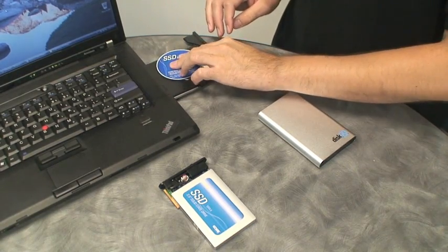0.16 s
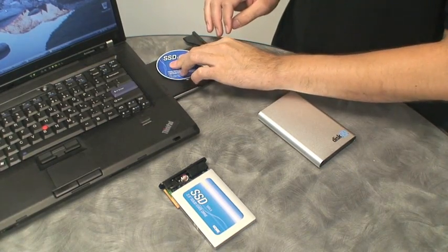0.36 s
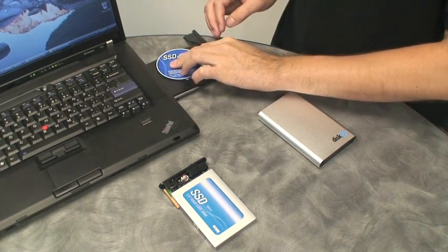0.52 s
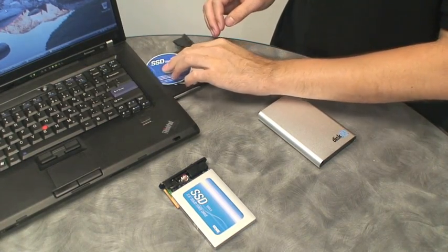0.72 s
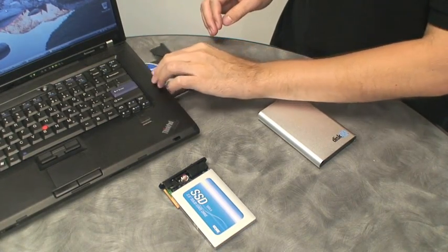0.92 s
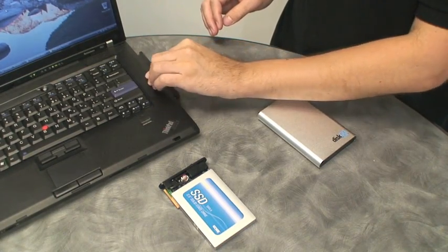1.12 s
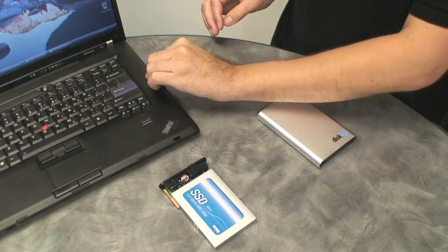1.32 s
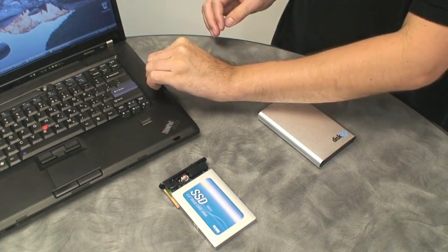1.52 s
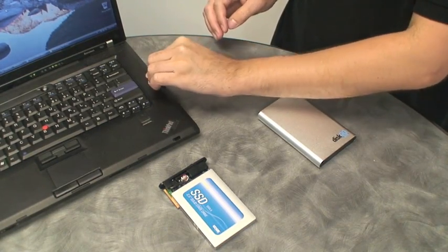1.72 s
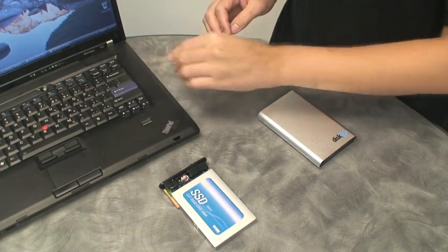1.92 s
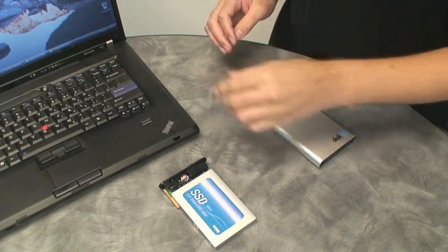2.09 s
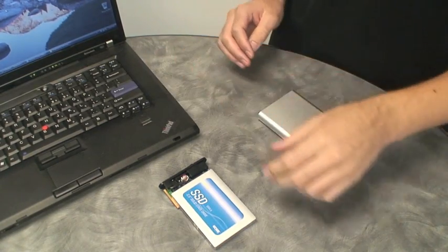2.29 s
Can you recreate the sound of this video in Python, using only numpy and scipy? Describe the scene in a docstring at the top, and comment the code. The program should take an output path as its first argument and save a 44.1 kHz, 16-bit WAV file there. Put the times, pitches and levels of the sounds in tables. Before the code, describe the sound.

A disc snaps hard onto a laptop drive hub, then the thin plastic tray knocks, scrapes inward and latches with a double click, close to the microphone in a small room with faint fan hum.

```python
"""Plastic contacts: a disc snaps onto the hub of a laptop drive tray, and the tray is slid shut and latched.
Each contact is a dying chatter of ticks that excites a ring at its own pitch and the tray's crowded modes.
The snap rings the modes of the disc; blows excite the modes of the table and the laptop case.
Fingers and rails rub faintly as dense fine grains, and a small room answers with a diffuse echo.
Steady filtered noise and a wavering motor tone make a fan-like hiss and hum beneath."""
import sys
import numpy as np
from scipy import signal
from scipy.fft import rfft, irfft
from scipy.io import wavfile
from scipy.ndimage import uniform_filter1d

SR = 44100
rng = np.random.default_rng(int(sys.argv[2]) if len(sys.argv) > 2 else 0)


def gain_from_decibels(decibels):
    """Convert decibel values to linear amplitude factors."""
    exponent = np.asarray(decibels, float) / 20
    return 10 ** exponent


def transcribe(signal):
    """Save signal, clipped to [-1, 1], as a 16-bit WAV file at the path in sys.argv[1]."""
    frames = np.atleast_2d(signal).T
    limited = np.clip(frames, -1, 1)
    pcm = np.round(limited * 32767).astype(np.int16)
    wavfile.write(sys.argv[1], SR, pcm)


N = 103635

# blows on table and case: t/s, level of the table push/dB, level of the case knock/dB,
# f/Hz of the part of the case that is driven most
BLOWS = [(.252, -34.5, -31, 980), (.668, -65, -45.5, 725), (.753, -51.5, -43, 954),
         (0.987, -45.5, -36.5, 620), (0.991, -54, -34.5, 1150), (1.208, -50, -54, 1150),
         (1.451, -38, -32, 610), (1.455, -76, -30.5, 920), (1.484, -60, -44, 920), (1.656, -72, -48, 680),
         (1.907, -45, -52, 1150), (1.931, -46.5, -63, 720)]


def rms_one(x):
    """Normalisation to unit mean power."""
    return x / np.sqrt(np.mean(x ** 2) + 1e-20)


def at_hz(points, hz):
    """Linear interpolation over logarithmic frequency."""
    f, value = np.transpose(points)
    return np.interp(np.log(hz), np.log(f), value)


def ring(x, hz, t60):
    """Damped resonance: a unit click sets a sine of initial height 1 ringing."""
    radius = gain_from_decibels(-60 / (max(t60, 0.002) * SR))
    w = 2 * np.pi * hz / SR
    return signal.lfilter([0, np.sin(w)], [1, -2 * radius * np.cos(w), radius ** 2], x + 1e-18)


def ticks(shape, rate, spread_db):
    """Random impulse process: clicks of uneven size and sign, rate per second."""
    sizes = gain_from_decibels(spread_db * np.minimum(rng.exponential(1, shape), 4))
    signs = rng.choice([-1, 1], shape)
    return sizes * signs * (rng.random(shape) < rate / SR)


def bin_hz(n):
    """Frequencies of the Fourier bins, held above 10 Hz for the logarithm."""
    return np.maximum(np.arange(n // 2 + 1) * SR / n, 10)


def coloured(x, spectrum):
    """Linear filtering by multiplication of the Fourier spectrum with a smooth gain."""
    n = x.shape[-1]
    return irfft(rfft(x) * gain_from_decibels(at_hz(spectrum, bin_hz(n))), n)


def drift(rate):
    """Low-passed noise: a slow random fluctuation of unit rms, rate in Hz."""
    hz = np.arange(N // 2 + 1) * SR / N
    gain = (hz > 0) / (1 + (hz / rate) ** 2)
    return rms_one(irfft(rfft(rng.standard_normal(N)) * gain, N))


def pair(mid, side, alike):
    """Interchannel correlation set by the balance of a shared and an opposed part."""
    alike = np.clip(alike, -1, 1)
    return np.sqrt(1 + alike) * mid + np.sqrt(1 - alike) * side * [[1], [-1]]


def hiss():
    """Stationary coloured noise whose correlation between left and right depends on frequency."""
    # spectrum of the hiss: f/Hz, level per Hz/dB (relative)
    hiss_colour = [(12, -49), (20, -9.5), (120, -5), (181, -3.5), (361, -8), (662, -7), (825, -9),
                   (1030, -10.5), (1150, -10.5), (1470, -14), (1940, -14), (5090, -21.5), (14500, -29)]
    # likeness of left and right: f/Hz, correlation (-1 to 1)
    hiss_likeness = [(60, 0.82), (130, 1), (290, 0.45), (640, -0.26), (1410, -0.8), (3100, -0.3),
                     (6820, 0.17), (15000, 1)]
    mid, side = rfft(coloured(rng.standard_normal((2, N)), hiss_colour))
    stereo = irfft(pair(mid, side, at_hz(hiss_likeness, bin_hz(N))), N)
    return gain_from_decibels(-54) * rms_one(stereo)


def hum():
    """Narrow-band noise: a band of random phases is heard as a wavering hum."""
    # humming bands: f/Hz, width at half amplitude/Hz, rms level/dB
    hum_bands = [(74.6, 16, -68), (114, 8.5, -70)]
    white = rfft(rng.standard_normal(N))
    out = np.zeros(N)
    for f, width, db in hum_bands:
        resonance = 1 / (1 + (2 * (bin_hz(N) - f) / width) ** 2)
        out += gain_from_decibels(db) * rms_one(irfft(white * resonance, N))
    return out


def motor_tone():
    """Frequency and amplitude modulation of a sine by slow random fluctuations."""
    tone_hz, waver_hz = 175.6, 1.5
    level_db, waver_db = -63, 2
    level = gain_from_decibels(level_db + waver_db * drift(6.3))
    phase = 2 * np.pi * np.cumsum(tone_hz + waver_hz * drift(1.6)) / SR
    return level * np.sqrt(2) * np.sin(phase)


def rubbing():
    """Friction as a dense train of micro-impacts, in a changing mixture of dull and bright."""
    # level of the rubbing of fingers and rails: t/s, level/dB
    rub_level = [(0, -59), (.6, -59.5), (.85, -56), (.87, -52.5), (.97, -52.5), (1.1, -55), (1.38, -54),
                 (1.6, -58.5), (1.74, -62.5), (1.755, -54), (1.78, -62.5), (1.89, -60.5), (1.903, -50),
                 (1.96, -52), (2.01, -54), (2.045, -59), (2.055, -52.5), (2.075, -62), (2.35, -64.5)]
    # dull part: f/Hz, level per Hz/dB (relative)
    dull_colour = [(250, -30.5), (500, 3), (1000, 6.5), (2000, 2), (3500, -9.5), (6000, -17.5),
                   (14000, -32)]
    # bright part: f/Hz, level per Hz/dB (relative)
    bright_colour = [(800, -27.5), (2000, -4.5), (5000, -5.5), (9000, -8.5), (13000, -12.5), (16000, -30.5)]
    # brighter on the rails than on the table: t/s, share of the bright part (0 to 1)
    bright_share = [(0, 0.06), (.8, 0.48), (1.45, 0.27), (1.7, 0.04), (2.35, 0)]
    grains_per_s, grain_spread_db, lumps_db = 6500, 2.3, 2.2
    t = np.arange(N) / SR
    share = np.clip(np.interp(t, *np.transpose(bright_share)), 0, 1)
    grains = ticks(N, grains_per_s, grain_spread_db) * gain_from_decibels(lumps_db * drift(33))
    dull = rms_one(coloured(grains, dull_colour))
    bright = rms_one(coloured(grains, bright_colour))
    return gain_from_decibels(np.interp(t, *np.transpose(rub_level))) * ((1 - share) * dull + share * bright)


def tray_response(hz, size):
    """Modal superposition: impulse responses of the tray's short modes, one row a mode, signs alternating."""
    # strength of the tray and disc modes: f/Hz, level/dB
    tray_strength = [(500, -27), (1000, -18), (1500, -20), (2000, -6.5), (2700, -3), (4500, -1), (6400, 0),
                     (8500, -4), (11000, -5.5), (13000, -4), (14000, -25), (15200, -6), (16300, -29.5)]
    tray_t60_s = 0.004
    click = np.eye(1, size)[0]
    return np.array([(-1) ** k * gain_from_decibels(at_hz(tray_strength, f)) * ring(click, f, tray_t60_s)
                     for k, f in enumerate(hz)])


def short_time_peak_one(x):
    """Normalisation to unit peak of the rms over 3 ms."""
    return x / np.sqrt(uniform_filter1d(x ** 2, size=132).max())


def contacts():
    """Impact excitation: a dying chatter of ticks drives a short ring and the tray; harder is sharper."""
    # plastic contacts: t/s, level/dB, f/Hz of the contact's own ring,
    # tray ring re that level/dB, chatter t60/s
    contact_list = [(0.1946, -30.5, 1680, -22.5, 0.027), (0.2460, -16, 8650, -7.5, 0.027),
                    (0.2467, -4.5, 2010, -16, 0.017), (0.2491, 0, 1877, -12.5, 0.029),
                    (0.2529, -9.5, 5760, -7.5, 0.025), (0.2557, -11.5, 11500, -7.5, 0.027),
                    (0.2588, -11.5, 2000, -13, 0.029), (0.2613, -20, 6460, -4.5, 0.044),
                    (0.2675, -21, 4760, -17, 0.015), (0.6662, -33, 2960, -12, 0.046),
                    (0.6716, -33, 2000, -12, 0.047), (0.6826, -42.5, 2200, -12, 0.04),
                    (0.7525, -29.5, 1980, -27, 0.0087), (0.9379, -41.5, 2830, -6.5, 0.017),
                    (0.9852, -23.5, 7000, -5, 0.0067), (0.9866, -11.5, 2050, -14, 0.013),
                    (0.9912, -24, 2840, -8, 0.035), (1.2024, -34.5, 1820, -22, 0.0094),
                    (1.2067, -17.5, 6780, -10.5, 0.014), (1.2078, -17, 3300, -18.5, 0.01),
                    (1.2130, -25.5, 3070, -10.5, 0.013), (1.2157, -24, 2900, -13, 0.021),
                    (1.3279, -29, 2560, -15, 0.024), (1.405, -26.5, 1780, -8.5, 0.014),
                    (1.411, -31.5, 1770, -6, 0.0073), (1.4484, -17, 2240, -13, 0.021),
                    (1.4497, -7.5, 2240, -20.5, 0.015), (1.4533, -21.5, 3000, -13, 0.03),
                    (1.4576, -22.5, 1950, -1.5, 0.035), (1.494, -23.5, 10300, -12, 0.0069),
                    (1.849, -39, 2200, -17.5, 0.014), (1.9, -34, 2920, -22, 0.053),
                    (1.9215, -36, 2400, -20, 0.02)]
    ticks_per_s, tick_spread_db, lead_tick_db = 9000, 4, 15
    rise_s = 0.0005
    own_ring_db, ring_at_2khz_s = -12.5, 0.0051
    # low-pass corner when the tray rings at -30 dB, and its growth with level
    sharp_at_30_hz, octaves_per_10_db = 7000, 1
    mode_spread_db, low_cut_hz = 1.5, 380

    size = 4096
    t = np.arange(size) / SR
    modes_hz = np.arange(480, 16400, 260.0)
    modes_hz = modes_hz + rng.uniform(-80, 80, len(modes_hz))
    responses = tray_response(modes_hz, size)
    out = np.zeros(N + SR)
    for s, db, hz, tray_db, t60 in contact_list:
        train = ticks(size, ticks_per_s, tick_spread_db)
        train[int(rise_s * SR) + 1] = gain_from_decibels(lead_tick_db)
        chatter = train * (1 - np.exp(-t / rise_s)) * gain_from_decibels(-60 * t / max(t60, 0.002))

        # each contact drives the modes a little differently
        response = gain_from_decibels(rng.normal(0, mode_spread_db, len(modes_hz))) @ responses
        tray = signal.fftconvolve(chatter, response)[:size]
        sharp_hz = sharp_at_30_hz * 2 ** (octaves_per_10_db * (db + tray_db + 30) / 10)
        sharp_hz = np.clip(sharp_hz, 1000, 18000)
        tray = signal.lfilter(*signal.butter(1, sharp_hz, fs=SR), tray)

        # higher contacts die sooner
        ring_s = ring_at_2khz_s * np.sqrt(2000 / hz)
        own = ring(ring(chatter, hz, ring_s), hz, ring_s / 2)
        both = gain_from_decibels(own_ring_db) * short_time_peak_one(own) + gain_from_decibels(tray_db) * short_time_peak_one(tray)
        start = int((s - rise_s) * SR)
        out[start:start + size] += gain_from_decibels(db) * both
    return signal.sosfilt(signal.butter(2, low_cut_hz, "high", fs=SR, output="sos"), out[:N])


def disc():
    """Free vibration: one blow, as the disc snaps onto the hub, sets its modes ringing."""
    # modes of the disc: f/Hz, level re the blow/dB, t60/s
    disc_modes = [(1388, -15, 0.056), (1500, -4.5, 0.066), (1644, -12, 0.054), (1770, -20, .05),
                  (1944, 4.5, 0.033), (2110, -12.5, 0.054)]
    snap_s, snap_db = 0.2497, -11
    blow = np.zeros(N)
    blow[int(snap_s * SR)] = gain_from_decibels(snap_db)
    return sum((-1) ** k * gain_from_decibels(db) * ring(blow, hz, t60) for k, (hz, db, t60) in enumerate(disc_modes))


def case_knock():
    """Selective modal excitation: a knock drives most the case modes nearest to its own frequency."""
    # modes of the case: f/Hz, level/dB, t60/s
    case_modes = [(470, -2, 0.14), (620, 1, 0.048), (720, 4, .05), (920, 6.5, 0.021), (1150, -0.5, 0.043),
                  (1320, 6, 0.083)]
    reach_octaves = 0.21
    s, _, case_db, near_hz = np.transpose(BLOWS)
    out = np.zeros(N)
    for k, (hz, db, t60) in enumerate(case_modes):
        nearness = np.exp(-(np.log2(hz / near_hz) / reach_octaves) ** 2)
        knock = np.zeros(N)
        knock[(s * SR).astype(int)] = gain_from_decibels(case_db + db) * nearness
        out += (-1) ** k * ring(knock, hz, t60)
    return out


def table_thump():
    """Low modal response: a delayed push sets the table top ringing."""
    # modes of the table: f/Hz, level/dB, t60/s
    table_modes = [(153, -10, 0.1), (259, 0, 0.13), (372, -11, .08)]
    lag_s = 0.0122
    s, table_db, _, _ = np.transpose(BLOWS)
    push = np.zeros(N)
    push[((s + lag_s) * SR).astype(int)] = gain_from_decibels(table_db)
    return sum(gain_from_decibels(db) * ring(push, hz, t60) for hz, db, t60 in table_modes)


def thumps():
    """Band-limited sum of the structural responses of case and table."""
    band = signal.butter(2, [110, 1800], "band", fs=SR, output="sos")
    return signal.sosfilt(band, case_knock() + table_thump())


def fading(power, t60):
    """Exponential energy decay: a leaky integrator that loses 60 dB in t60."""
    kept = gain_from_decibels(-2 * 60 / (t60 * SR))
    return signal.lfilter([1 - kept], [1, -kept], power)


def room(x):
    """Diffuse-field decay: arriving energy dies away as noise, soon off near surfaces, slowly off walls."""
    # slow decay: f/Hz, t60/s
    room_t60 = [(200, 0.14), (530, 0.84), (1390, 0.41), (3680, 0.56), (9700, 0.39)]
    # level of the room sound: f/Hz, level/dB
    room_level = [(200, -11), (600, -7.5), (1700, -11), (3000, -9.5), (5500, -9.5), (9000, -9),
                  (15000, -17)]
    # likeness of left and right: f/Hz, correlation (-1 to 1)
    room_likeness = [(200, .7), (600, 0.96), (1700, 0.84), (4000, 0.91), (9000, 0.72), (15000, 0.85)]
    onset_s = 0.0011
    early_t60_s, early_db = 0.132, 1
    edges_hz = 110 * 2 ** np.arange(0, 7.4, 1 / 3)   # third-octaves
    white = rng.standard_normal((2, 2, N))
    onset = np.exp(-1 / (onset_s * SR))
    out = np.zeros((2, N))
    for k, (low, high) in enumerate(zip(edges_hz, edges_hz[1:])):
        hz = np.sqrt(low * high)
        band = signal.butter(2, [low, high], "band", fs=SR, output="sos")
        power = signal.lfilter([1 - onset], [1, -onset], signal.sosfilt(band, x) ** 2)
        late = fading(power, max(at_hz(room_t60, hz), 0.05))
        early = gain_from_decibels(2 * early_db) * fading(power, early_t60_s)
        # neighbouring bands take different noise
        mid, side = signal.sosfilt(band, white[k % 2])
        noise = rms_one(pair(mid, side, at_hz(room_likeness, hz)))
        out += gain_from_decibels(at_hz(room_level, hz)) * np.sqrt(np.abs(late + early)) * noise
    return out


def scene():
    """Superposition of the near sounds in the centre, their room, and the background."""
    background = hiss() + hum() + motor_tone()
    near = rubbing() + contacts() + disc() + thumps()
    return near + room(near) + background


def band_limit(x):
    """A steep low-pass at the top of the band."""
    return signal.sosfilt(signal.butter(12, 16660, fs=SR, output="sos"), x)


def record(dry):
    """Saturation and band limiting: the hardest peaks are rounded and the top is cut at 16 kHz."""
    rounded = np.tanh(dry)
    top_cut = signal.cheby2(12, 50, 16000, fs=SR, output="sos")
    mix = signal.sosfilt(top_cut, rounded)
    return band_limit(mix)


dry = scene()
out = record(dry)
transcribe(out)
```